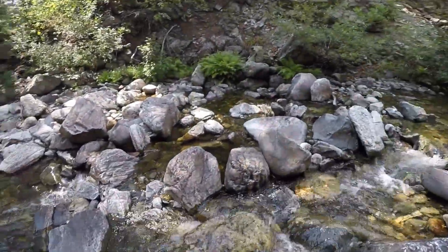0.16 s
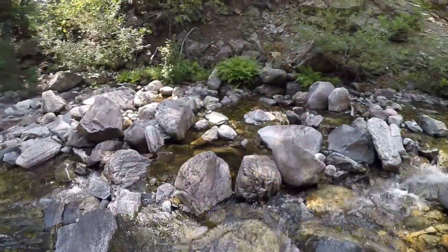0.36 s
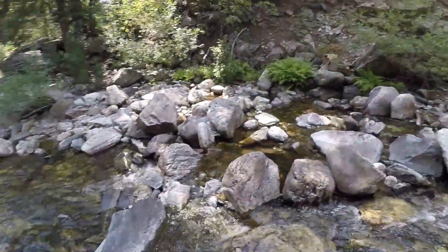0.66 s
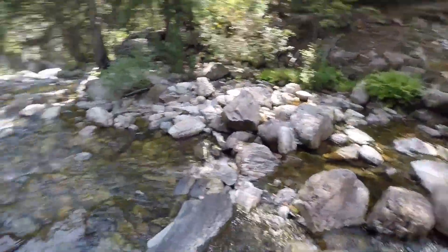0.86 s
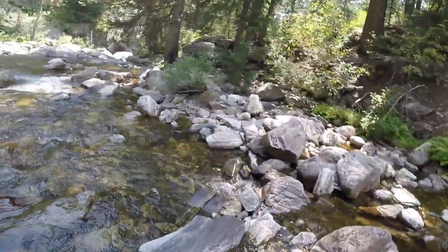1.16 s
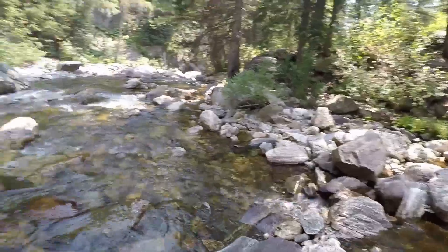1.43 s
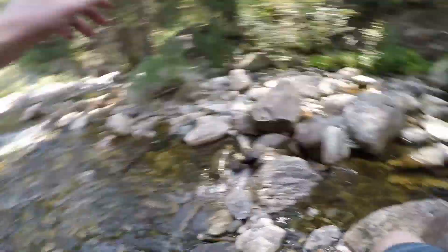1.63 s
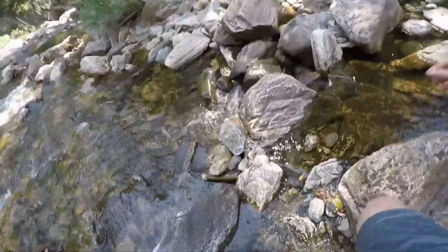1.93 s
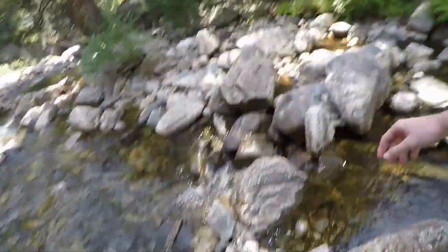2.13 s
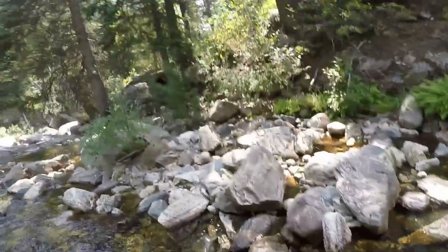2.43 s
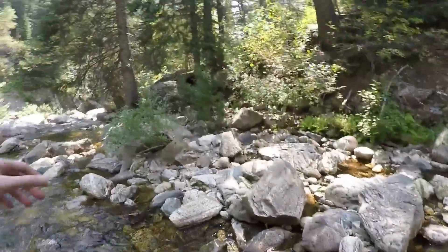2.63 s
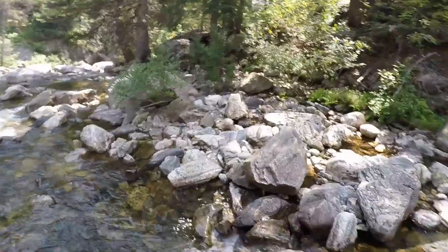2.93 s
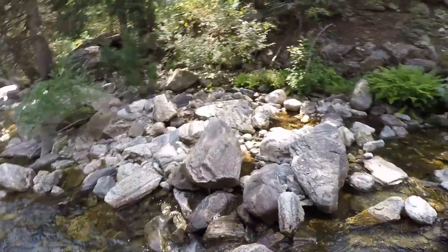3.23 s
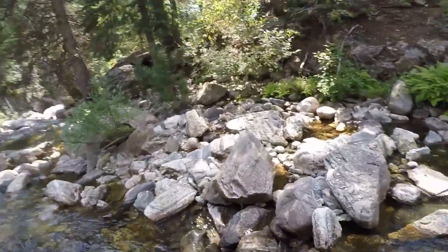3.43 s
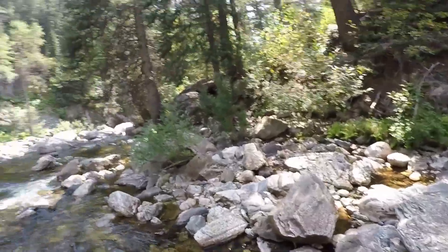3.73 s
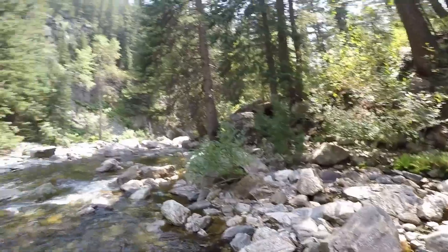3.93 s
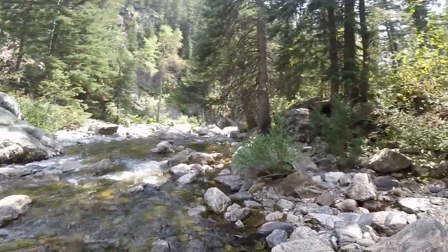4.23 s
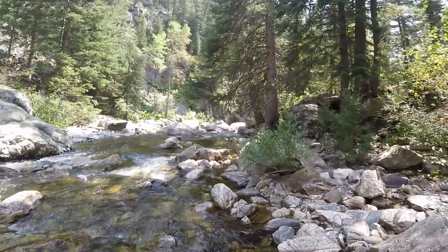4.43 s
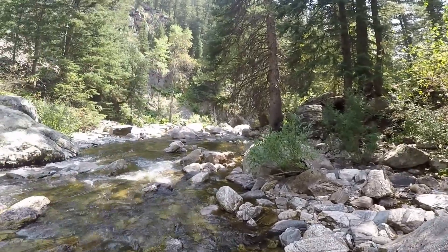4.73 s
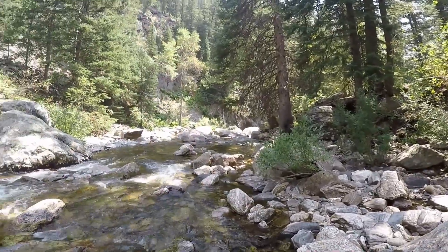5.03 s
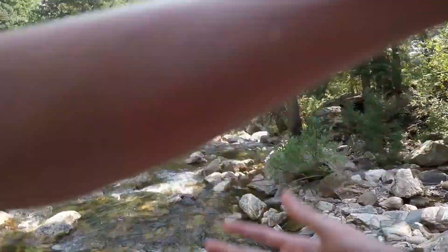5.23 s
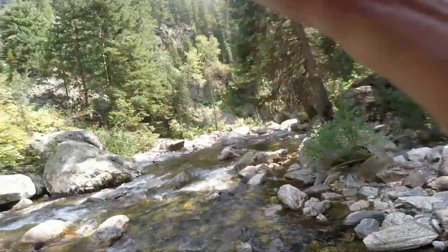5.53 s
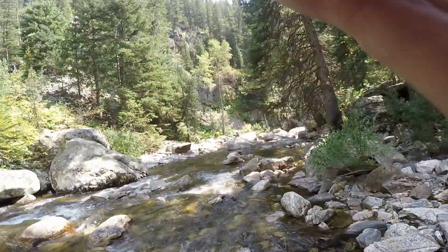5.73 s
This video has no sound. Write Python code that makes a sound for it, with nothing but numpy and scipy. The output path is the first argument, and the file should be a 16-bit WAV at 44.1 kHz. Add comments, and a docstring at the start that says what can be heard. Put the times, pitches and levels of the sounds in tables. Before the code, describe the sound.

A shallow creek rushes over rocks while a body-worn microphone creaks, knocks and catches small puffs of wind.

```python
"""A shallow creek rushes and burbles over rocks: broadband turbulence and the resonance of bubbles.
It is heard from a body-worn camera, whose plastic housing colours the water. Moving arms make the mount
creak by stick-slip friction, knock, and rub against cloth; a finger taps the case once.
A steady throb and a few bumps are conducted through the strap, and eddies buffet the microphone.
Under the water, radio interference ticks faintly about ten times a second."""
import sys
import numpy as np
from scipy import signal
from scipy.fft import rfft, irfft
from scipy.io import wavfile
from scipy.ndimage import uniform_filter1d

SR = 44100
rng = np.random.default_rng(int(sys.argv[2]) if len(sys.argv) > 2 else 0)


def put_to_file(sound):
    """Save the sound as 16-bit audio at rate SR, in the file named by the first command-line argument."""
    columns = np.atleast_2d(sound).T  # one column per channel
    safe = np.clip(columns, -1, 1)
    whole_steps = np.round(safe * 32767)
    wavfile.write(sys.argv[1], SR, whole_steps.astype(np.int16))


N = 259037
T = np.arange(N) / SR

# Level of the rushing noise, low and high, swelling briefly as arms and cloth move:
# time_s, low_db, high_db (both relative)
RUSH_LEVELS = [(0.0, -44.5, -59.5), (1.14, -45, -60), (1.6, -40, -60.5), (1.96, -45, -59.5),
               (2.35, -45.5, -60.5), (4.27, -46, -61.5), (5.21, -45, -60.5), (5.46, -43, -57),
               (5.62, -43, -59.5), (5.87, -45.5, -59.5)]
# Spectrum of the water: frequency_hz, gain_db
WATER_SPECTRUM = [(88, -31), (150, -6.5), (425, -10), (802, -11), (918, -7.5), (1230, -7.5), (1670, -4.5),
                  (2270, -6.5), (2600, -4.5), (2970, -7.5), (3600, -8.5), (4910, -21.5), (7350, -25.5),
                  (8100, -31.5), (15000, -35.5)]
# Resonances and antiresonances of the housing: centre_hz, width_hz, gain_db
HOUSING_BANDS = [(1030, 490, 2), (1193, 87, -5.5), (1550, 350, 2.5), (1910, 136, -4.5), (2240, 240, -2),
                 (2600, 114, 3.5), (3380, 195, -5), (3550, 235, 4.5), (3790, 67, -5), (10120, 710, 4)]
# Small splashes close by: start_s, level_db, pitch_hz
SPLASH_EVENTS = [(.335, -48, 8500), (.807, -41, 5600), (2.69, -51, 8300), (3.8, -45, 6300),
                 (4.715, -47, 10000), (4.84, -45, 7400)]
# Runs of slips in the plastic joint: start_s, end_s, first_gap_s, settled_gap_s, breakaway_db,
# next_slip_db, turn_s, turn_db (time and level at which the creak's loudness turns), last_slip_db
CREAK_RUNS = [(1.285, 1.484, 0.047, .0098, -13.5, -17.5, 1.44, -9, -13.5),
              (1.629, 1.706, .016, .0175, -17.5, -16.5, 1.7, -19, -16),
              (2.841, 2.97, .043, .031, -11, -16.5, 2.955, -17.5, -16.5)]
# Single blows on the mount: start_s, level_db, centre_hz, breadth_ratio (bandwidth over centre)
MOUNT_KNOCKS = [(1.032, -19.5, 497, 0.2), (1.077, -27, 1050, .3), (1.566, -27.5, 1500, 2),
                (1.807, -18, 1580, 0.53), (1.815, -16, 670, 0.78), (1.865, -15.5, 1640, 0.3),
                (2.194, -33, 414, 0.39), (2.319, -24.5, 1070, 0.24), (3.421, -16.5, 1630, 0.72),
                (3.54, -23, 1790, 1.3), (3.986, -19, 1800, 1.2), (4.008, -14, 1820, 0.99),
                (5.266, -19, 1730, .45), (5.493, -12, 555, 0.43), (5.522, -19.5, 1200, 1)]
# Modes of the plastic housing: pitch_hz, t60_s, gain_db
HOUSING_MODES = [(587, .04, -8), (1087, .016, -4), (1400, .007, -4), (1740, .014, 1), (1850, .06, -15),
                 (1990, .013, 3), (2420, .014, -12), (3200, .011, 1), (3600, .011, -8), (4500, .009, -14),
                 (5380, .008, -12), (6400, .007, -20), (10000, .007, -28)]
# Low modes of the whole mount: pitch_hz, t60_s, gain_db
RECOIL_MODES = [(131.6, 0.074, -12), (345, 0.037, -14), (446, 0.045, -14.5), (569, 0.063, -14),
                (790, 0.026, -13)]
# Modes of the edge of the case: pitch_hz, t60_s, gain_db
EDGE_MODES = [(1080, 0.018, -4.5), (1207, 0.0089, 4.5), (1626, 0.021, 3), (2390, 0.0074, -1.5),
              (3370, 0.011, -4), (4420, 0.0079, -10), (5500, 0.0083, -12)]
# Modes of the camera on its strap: pitch_hz, t60_s (before the jolt's own damping), gain_db
SHUDDER_MODES = [(74.2, .31, -9), (100, .27, -12.5), (132, .048, -25)]
# Bumps of the body against the camera: start_s, level_db, pitch_hz, decay_s
BODY_BUMPS = [(.584, -25, 120, 0.0045), (1.626, -10.5, 24.8, 0.076), (1.718, -13, 27, 0.027),
              (1.825, -7, 29.7, 0.033), (2.198, -22.5, 122, .003), (2.322, -15.5, 110, 0.0061),
              (2.329, -9, 26.7, 0.048), (2.871, -22.5, 94, .0058)]
# Strokes of cloth on the mount: start_s, end_s, level_db
CLOTH_STROKES = [(1.608, 1.75, -31.5), (1.725, 1.818, -33), (1.813, 1.838, -29), (2.843, 3.013, -40.5),
                 (5.264, 5.502, -34.5), (5.463, 5.62, -39)]
# Spectrum of the rustle: frequency_hz, gain_db
CLOTH_SPECTRUM = [(60, 2.5), (125, 10), (250, -0.5), (430, 0), (600, 0), (760, -1.5), (1090, 8.5),
                  (1350, -6.5), (2000, -3), (3400, -10.5), (4500, -14), (6500, -20.5), (8500, -50),
                  (10000, -30.5), (15000, -46)]
# Puffs of air as the arms and body move: peak_s, half_length_s, level_db
AIR_PUFFS = [(1.668, .24, -27), (2.36, 0.095, -34), (2.92, 0.11, -38.5), (4.05, 0.099, -32),
             (5.496, .2, -32)]
# Spectrum of the buffeting: frequency_hz, gain_db
WIND_SPECTRUM = [(20, 2.5), (35, 0.5), (60, -5.5), (120, -11), (200, -29), (400, -48), (800, -68)]
# Spectrum of the faint hiss: frequency_hz, gain_db
HISS_SPECTRUM = [(40, 6.5), (300, -2.5), (1000, -1.5), (3000, 7.5), (6000, -11), (15000, -19)]


def creek(low_gain_db=.5, high_gain_db=17, split_hz=4500):
    """Turbulence upstream, near burbles and fine spray are filtered by the resonances of the housing."""
    rush, surge = np.zeros(N), walk(2.63)
    for hz in np.geomspace(150, 14000, 14):
        noise = band(rng.standard_normal(N), hz, hz * .4)
        rush += noise * undb(.4 * surge + 1.1 * walk(22) + .5 * walk(5))
    burble = bubbles(count=4000, low_hz=500, high_hz=4200, cycles=13, spread_db=2.2, glide=.05)
    spray = bubbles(count=3500, low_hz=4280, high_hz=13100, cycles=14.4, spread_db=2.5, glide=.028)
    spray *= undb(5.5 * np.tanh(walk(17)))  # water slops over the stones
    water = unit(colour(unit(rush) + undb(-8.5) * burble + undb(-5.5) * spray, WATER_SPECTRUM))
    for hz, width, db in HOUSING_BANDS:
        water += (undb(db) - 1) * band(water, hz, width)
    sheen_db = 3.5 * swell_at(4.44, half_s=.58)  # a narrow band rises while facing upstream
    water += (undb(sheen_db) - 1) * band(water, 7640, 570)
    treble = butterworth(water, 1, split_hz, "high")
    low_gain = undb(low_gain_db + curve(RUSH_LEVELS, column=1))
    high_gain = undb(high_gain_db + curve(RUSH_LEVELS, column=2))
    return low_gain * (water - treble) + high_gain * treble


def bubbles(count, low_hz, high_hz, cycles, spread_db, glide):
    """Each bubble is a damped oscillator whose pitch rises as it nears the surface."""
    out = np.zeros(N)
    for when, height, strength, life in rng.random((count, 4)):
        hz = low_hz * (high_hz / low_hz) ** height
        ring_s = cycles * (.5 + life) / hz
        t = np.arange(int(2 * ring_s * SR)) / SR
        gain = undb(-spread_db * np.log(max(strength, .04))) * np.sqrt(hz / low_hz)
        phase = 2 * np.pi * hz * t * (1 + glide * t / ring_s / 2)
        add(out, when * T[-1], gain * np.exp(-np.e * t / ring_s) * np.sin(phase))
    return unit(out)


def splashes(drops=8, scatter_s=.014, cycles=16):
    """Each splash is a handful of tiny drops, each a briefly ringing damped oscillation."""
    out, t = np.zeros(N), T[:SR // 100]
    for s, db, hz in SPLASH_EVENTS:
        for when, height, strength in rng.random((drops, 3)):
            pitch = hz * (1 + .24 * (height - .5))
            drop = np.exp(-np.e * t * pitch / cycles) * np.sin(2 * np.pi * pitch * t)
            add(out, s + scatter_s * when, undb(db) * strength * drop)
    return out


def mount():
    """Impact excitation: slips and knocks ring the housing; soft blows reach only its low modes."""
    out, t = np.zeros(N), T[:SR // 12]
    onset = np.sin(np.pi / 2 * np.minimum(t / .0016, 1)) ** 2
    for s, db, hz, breadth in MOUNT_KNOCKS + slips():
        crack = rng.standard_normal(len(t)) * undb(-8.5) * np.exp(-t / .0022)
        hit = band((ring(HOUSING_MODES, t) + crack) * onset, hz, hz * max(breadth, .1))
        reach_hz = min(hz * (1 + 2.6 * breadth), 5800)
        hit = butterworth(hit, 2, reach_hz)
        hit /= np.std(hit[:SR // 200])
        # the whole mount recoils, more so under a soft, slow blow
        recoil = ring(RECOIL_MODES, t) * onset * (600 / hz) ** .53
        add(out, s + .0003, undb(db) * (undb(-9) * hit + recoil))
    return out


def slips(centre_hz=1580, breadth=2.3, scatter_db=1.7, jitter_s=.001):
    """Stick-slip friction: the joint breaks away, then settles to a ratchet. Returns rows of blows."""
    rows = []
    for start, end, gap, settled, snap_db, next_db, turn_s, turn_db, last_db in CREAK_RUNS:
        rows.append((start, snap_db, centre_hz, breadth))
        s = second_slip_s = start + gap
        for late, louder, brighter in rng.standard_normal((24, 3)):
            if s < end:
                to_turn = np.interp(s, [second_slip_s, turn_s], [0, 1]) ** 1.5
                past_turn = np.clip((s - turn_s) / max(end - turn_s, jitter_s), 0, 1)
                db = next_db + (turn_db - next_db) * to_turn + (last_db - turn_db) * past_turn
                hz = centre_hz * np.exp(.19 * brighter)
                rows.append((s + jitter_s * late, db + scatter_db * louder, hz, breadth))
            gap = settled + .5 * (gap - settled)
            s += gap
    return rows


def finger_tap(start_s=5.6018, peak_db=-6.5):
    """An impact excites the edge modes of the case; the compliant fingertip softens the attack."""
    out, t = np.zeros(N), T[:SR // 8]
    crack = undb(-11) * rng.standard_normal(len(t)) * np.exp(-t / .0018)
    hit = (ring(EDGE_MODES, t) + crack) * (1 - np.exp(-t / .00097))
    hit = butterworth(hit, 3, [750, 4800], "band")
    add(out, start_s, undb(peak_db) * hit / np.abs(hit).max())
    return out


def strap_thumps():
    """Structure-borne sound: dull jolts pass through the strap and set the camera briefly wobbling."""
    out, t = np.zeros(N), T[:SR // 4]
    for s, db, hz, decay_s in throb() + BODY_BUMPS:
        envelope = np.exp(-t / decay_s) * (1 - np.exp(-t / .0051))
        jolt = (np.sin(2 * np.pi * hz * t) + ring(SHUDDER_MODES, t)) * envelope
        add(out, s - .002, -undb(db + 1) * jolt / np.abs(jolt).max())
    return out


def throb(beats=15, gap_s=.3497, slowing_s=.00082, pitch_hz=43.1, decay_s=.034):
    """A nearly periodic, slowing excitation, probably the wearer's pulse. Returns rows of bumps."""
    beat = np.arange(beats)
    times = .187 + gap_s * beat + slowing_s * beat ** 2 / 2
    levels_db = -19 - 11 * np.exp(-times / .54)  # starts faint and grows in
    return [(s, db + louder, pitch_hz * np.exp(.09 * higher), decay_s)
            for s, db, (louder, higher) in zip(times, levels_db, rng.standard_normal((beats, 2)))]


def cloth():
    """Sliding friction: fibres catch and let go, giving a dense, grainy rustle during each stroke."""
    pressure = np.zeros(N)
    for start, end, db in CLOTH_STROKES:
        add(pressure, start, undb(db) * signal.windows.tukey(int((end - start) * SR), .6))
    grains = rng.standard_normal(N) * undb(3 * np.tanh(walk(300)) + np.tanh(walk(45)))
    return pressure * unit(colour(grains, CLOTH_SPECTRUM))


def wind(breeze_db=-43, flutter_db=2.5, flutter_hz=25):
    """Turbulent pressure: eddies reach the microphone port in uneven puffs over a light breeze."""
    strength = undb(breeze_db) + sum(undb(db) * swell_at(s, half_s) for s, half_s, db in AIR_PUFFS)
    rumble = unit(colour(rng.standard_normal(N), WIND_SPECTRUM))
    return rumble * strength * undb(flutter_db * walk(flutter_hz))


def interference(gap_s=.1024, whine_hz=12617):
    """Electromagnetic coupling: radio bursts leak into the microphone as ticks, beside a thin whine."""
    ticks, t = np.zeros(N), T[:SR // 8]
    rise = t / .0007
    spike = undb(-29) * rise * np.exp(1 - rise)
    rebound = undb(-27.5) * np.sin(2 * np.pi * 27 * t) * np.exp(-t / .037)
    for s in np.arange(.0485, T[-1], gap_s):
        add(ticks, s, rebound - spike)
    whine = undb(-80) * np.sin(2 * np.pi * whine_hz * T)
    return butterworth(ticks, 2, 520) + whine


def ring(modes, t):
    """Modal superposition: damped sines that vary a little in level, pitch and phase on every blow."""
    chance = rng.standard_normal((len(modes), 3)) * [1.2, .012, .15]
    out = np.zeros(len(t))
    for (hz, t60, db), (louder, sharper, turn) in zip(modes, chance):
        out += undb(db + louder - 60 * t / t60) * np.sin(2 * np.pi * (hz * (1 + sharper) * t + turn))
    return out


def band(x, hz, width):
    """A second-order resonance with gain 1 at its centre."""
    quality = hz / min(width, SR * .3)
    return signal.lfilter(*signal.iirpeak(min(hz, SR * .45), quality, fs=SR), x)


def butterworth(x, order, hz, kind="low"):
    """A filter with a maximally flat passband."""
    return signal.sosfilt(signal.butter(order, hz, kind, fs=SR, output="sos"), x)


def colour(x, points, size=2 ** 18):
    """Spectral shaping by gains interpolated over log frequency."""
    hz, db = np.transpose(points)
    bins_hz = np.maximum(np.fft.rfftfreq(size, 1 / SR), 1)
    gain = undb(np.interp(np.log(bins_hz), np.log(hz), db))
    return irfft(rfft(x, size) * gain)[:N]


def walk(rate_hz):
    """Random modulation: held values, smoothed twice and scaled to rms 1."""
    hold = int(SR / rate_hz)
    steps = np.repeat(rng.standard_normal(N // hold + 2), hold)
    return unit(uniform_filter1d(uniform_filter1d(steps, hold), hold)[:N])


def swell_at(s, half_s):
    """A bell-shaped envelope, 1 at time s."""
    return np.exp(-((T - s) / half_s) ** 2)


def curve(rows, column):
    """Linear interpolation of one table column in time."""
    rows = np.array(rows)
    return np.interp(T, rows[:, 0], rows[:, column])


def add(out, s, sound):
    """Superpose a sound at time s."""
    i = int(np.clip(s * SR, 0, N - 1))
    out[i:i + len(sound)] += sound[:N - i]


def undb(db):
    """Decibels to amplitude ratio."""
    return 10 ** (np.asarray(db) / 20)


def unit(x):
    """Normalise to rms 1."""
    return x / np.sqrt(np.mean(x ** 2))


def scene():
    """Superposition at one microphone feeds both channels; only a faint hiss differs between them."""
    mid = creek() + splashes() + mount() + finger_tap() + strap_thumps()
    mid += wind() + cloth() + interference()
    side = undb(-69.5) * unit(colour(rng.standard_normal(N), HISS_SPECTRUM))
    return np.array([mid + side, mid - side])


def record(dry):
    """Band limiting: the camera drops the deepest bass and cuts the top steeply."""
    dry = butterworth(dry, 1, 12, "high")
    return signal.sosfilt(signal.ellip(10, .2, 80, 15250, fs=SR, output="sos"), dry)


dry = scene()
out = record(dry)
put_to_file(out)
```